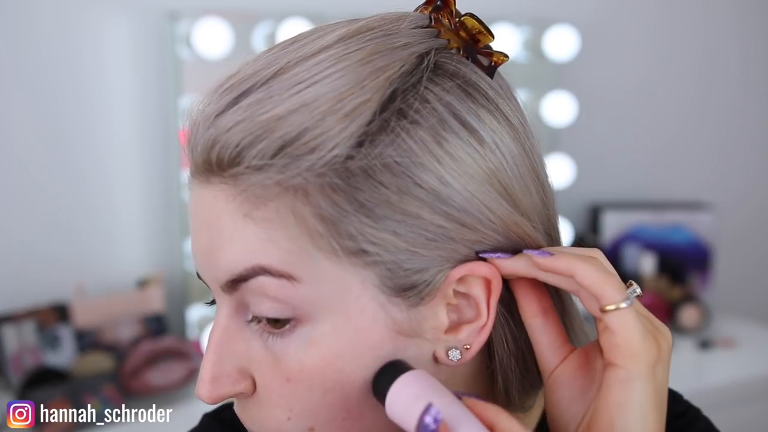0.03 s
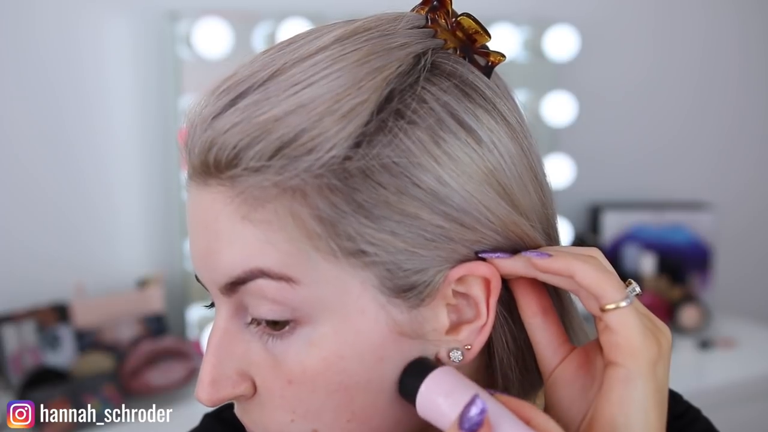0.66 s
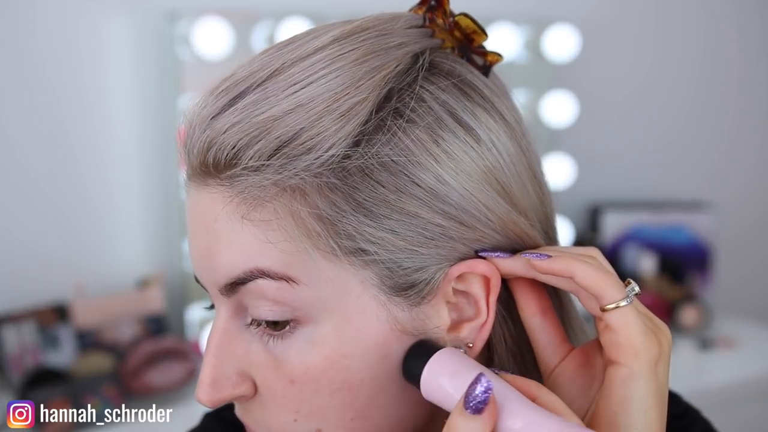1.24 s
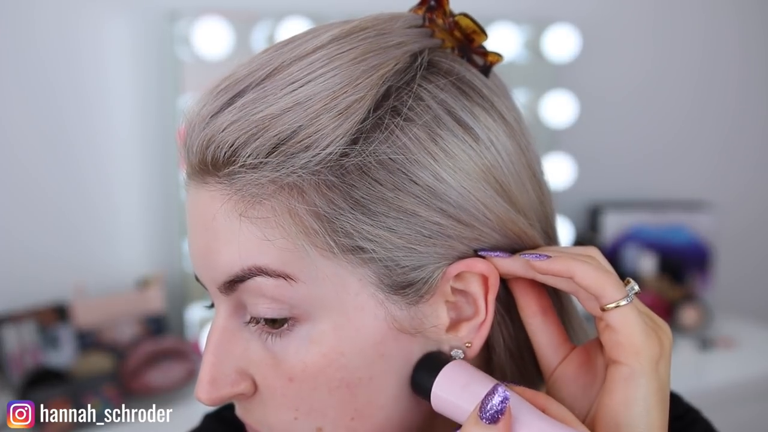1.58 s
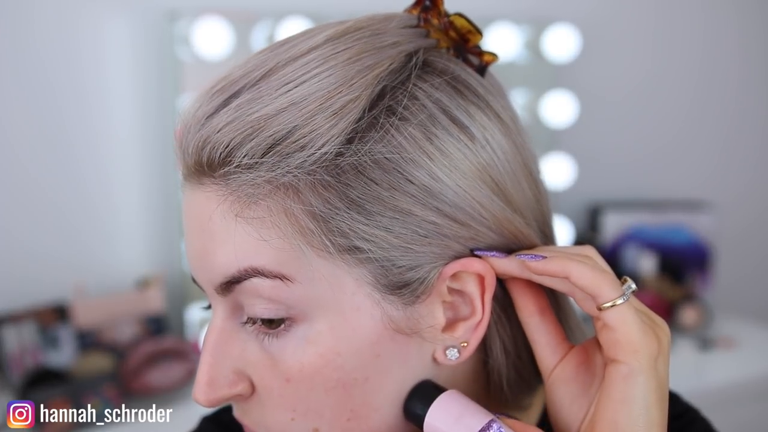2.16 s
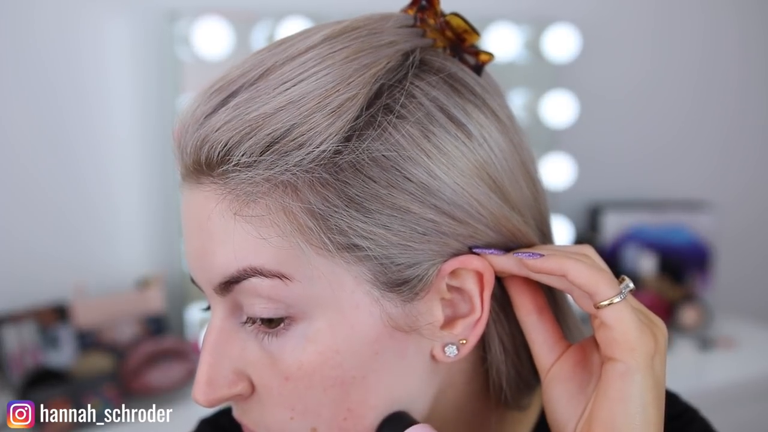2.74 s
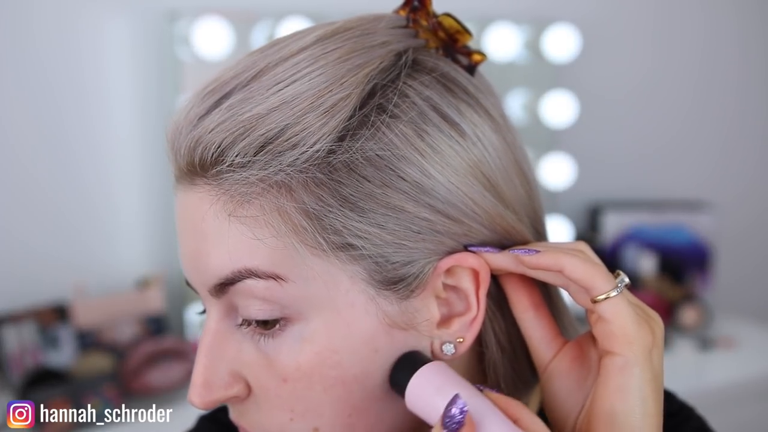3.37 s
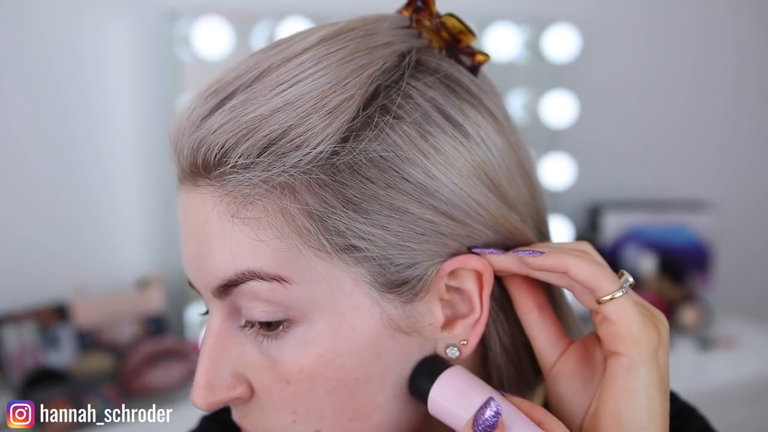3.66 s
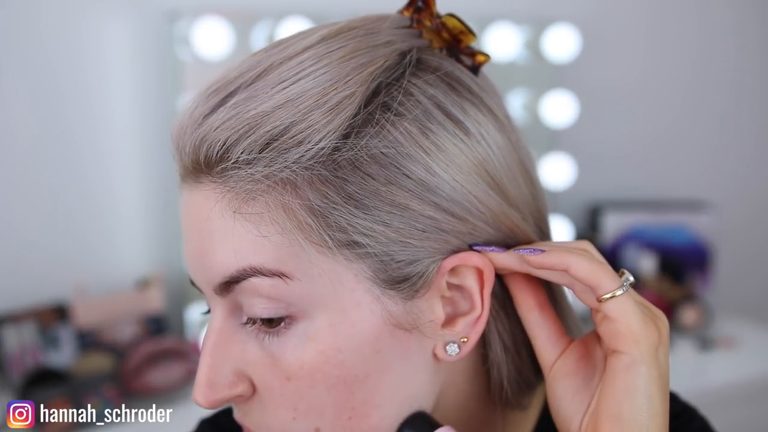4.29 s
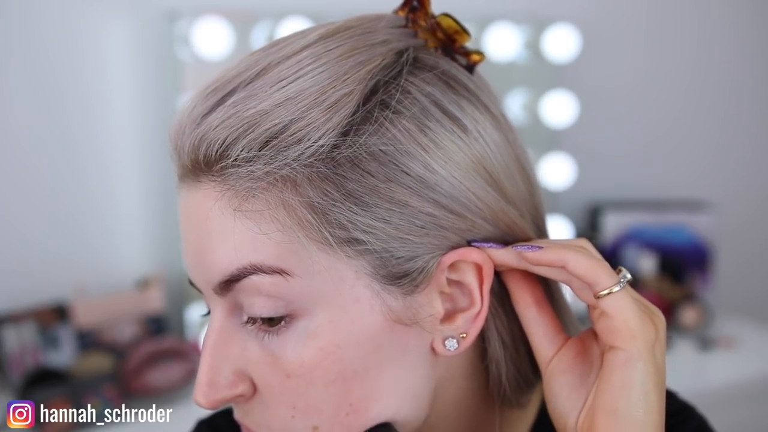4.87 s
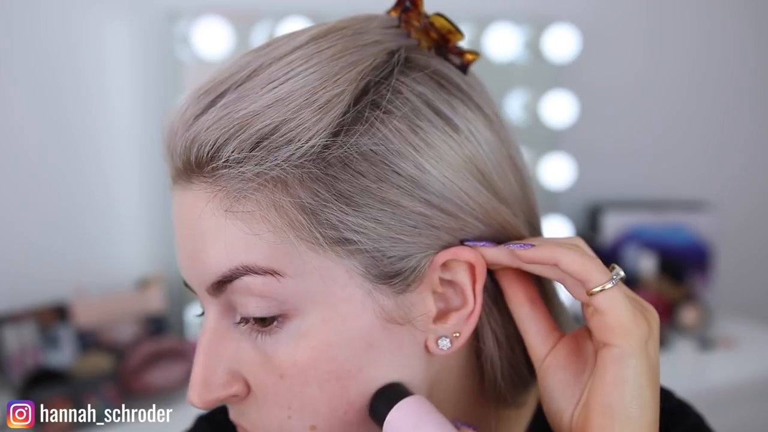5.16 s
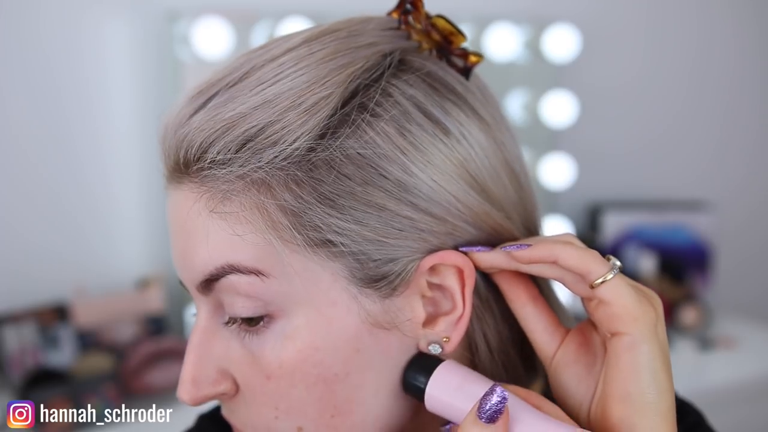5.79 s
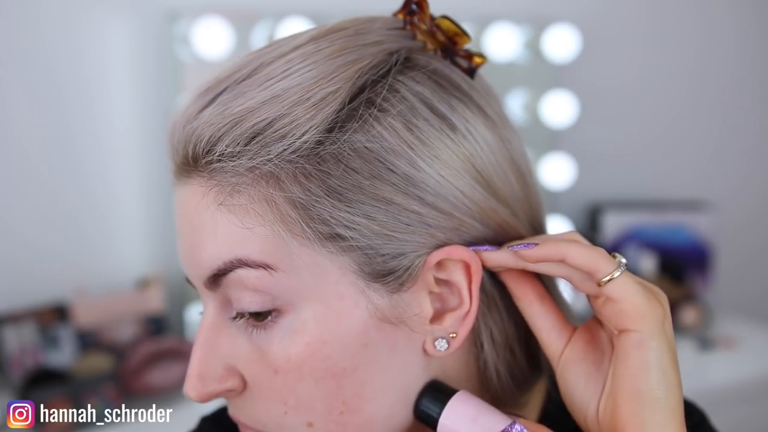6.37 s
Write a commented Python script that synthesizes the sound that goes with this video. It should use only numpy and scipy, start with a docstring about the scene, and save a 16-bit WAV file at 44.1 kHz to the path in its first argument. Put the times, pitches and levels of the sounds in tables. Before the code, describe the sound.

Close up in a quiet room, a little electric razor buzzes without a break as it moves over skin. Its spinning blade gives a high metallic whine and a fine scraping hiss, with a light plastic rattle underneath. The pitch dips and recovers several times as the motor is loaded, with occasional thin squeals and two small clusters of faint snips.

```python
'''A high, buzzing whine: a small battery razor circles over a cheek, close by in a quiet room.
On every turn its rotary blade knocks and scrapes inside the steel cap, driving the resonances of cap
and plastic handle; beneath them the motor hums, mostly on multiples of three times the turn rate.
Pressure on the skin slows the motor and turns the even buzz into a loose hiss.
Now and then the cap squeals or brushes the skin, and hairs are snipped.'''
import sys
import numpy as np
from scipy import signal
from scipy.fft import rfft, irfft, next_fast_len
from scipy.io import wavfile
from scipy.ndimage import uniform_filter1d, map_coordinates

SR = 44100
rng = np.random.default_rng(int(sys.argv[2]) if len(sys.argv) > 2 else 0)


def dump(signal):
    """Clip the signal to [-1, 1] and save it as 16-bit WAV at the path in sys.argv[1]."""
    limited = np.clip(np.atleast_2d(signal).T, -1, 1)
    pcm = np.round(limited * 32767).astype(np.int16)
    wavfile.write(sys.argv[1], SR, pcm)


N = 283563
TIME = np.arange(N) / SR
WHINE_HZ = 7107  # the cap's main resonance at the usual motor speed

# motor speed, sagging as the cap is pressed on the skin: (time [s], speed [turns/s])
MOTOR_SPEED = [(0.0, 82.6), (0.38, 79.6), (0.39, 79.6), (0.75, 83.7), (1.11, 82.1), (1.18, 80.5),
               (1.22, 80.2), (1.5, 83.3), (2.44, 85.2), (2.63, 85.9), (3.11, 83.6), (3.46, 79.7),
               (3.67, 80.1), (3.74, 79.7), (3.87, 79.9), (4.24, 86.3), (4.55, 87.3), (4.8, 86.5),
               (4.91, 85.6), (5.03, 85.7), (5.41, 82.3), (5.8, 83.7), (5.91, 83.4), (6.03, 84.8),
               (6.12, 85.2), (6.39, 83.0), (6.43, 83.1)]
# the blade's friction in the cap: (time [s], relative scrape level [dB], relative sizzle level [dB])
FRICTION_LEVELS = [(0.0, -27.5, -29), (0.03, -31.5, -44), (0.34, -30.5, -32.5), (0.91, -30, -39),
                   (1.11, -30, -32), (2.02, -33.5, -41), (2.22, -37.5, -36), (2.49, -34.5, -45),
                   (2.88, -34, -40), (2.97, -27.5, -32), (3.51, -28, -32), (3.8, -32, -47),
                   (3.94, -35, -39), (4.23, -32, -40), (4.62, -28.5, -32), (4.73, -29, -37),
                   (5.07, -29, -28), (5.57, -29, -32), (5.62, -28, -29), (6.11, -34.5, -32),
                   (6.25, -30.5, -37), (6.43, -31.5, -40)]
# the main resonance, swelling and dropping as the hand circles: (time [s], relative level [dB])
WHINE_LEVEL = [(0.0, -29), (0.2, -19), (0.43, -30.5), (0.53, -21), (0.72, -20), (0.82, -32.5), (0.97, -17),
               (1.13, -26), (1.2, -36), (1.23, -21.5), (1.29, -32), (1.45, -19.5), (2.69, -24), (2.83, -26),
               (3.06, -21), (3.63, -22), (3.71, -17), (3.9, -22), (4.05, -22.5), (4.14, -29), (4.57, -15.5),
               (4.76, -27.5), (4.78, -27), (5.37, -20), (5.39, -23.5), (5.71, -20), (6.05, -29.5),
               (6.43, -20.5)]
# response of the plastic handle: (frequency [Hz], gain [dB])
HANDLE_RESPONSE = [(900, -64), (1200, -16), (1450, -6), (1800, 0), (2050, 2), (2350, -5), (2600, -3.5),
                   (2950, -7.5), (3500, -2.5), (4300, 1.5), (5100, 2), (6000, -8), (8000, -45)]


def amp(db):
    """Decibels to amplitude ratio."""
    return 10 ** (np.asarray(db) / 20)


def curve(rows, column=1):
    """Linear interpolation of one table column at every sample."""
    rows = np.asarray(rows)
    return np.interp(TIME, rows[:, 0], rows[:, column])


def evened(x):
    """Normalisation to an overall rms of 1."""
    return x / np.sqrt(np.mean(x ** 2) + 1e-20)


def steadied(x, size=2100):
    """Normalisation to a running rms of 1 over a few turns."""
    return x / np.sqrt(uniform_filter1d(uniform_filter1d(x ** 2, size), size) + 1e-12)


def drift(rate_hz, count=8192):
    """Random modulation: noise of rms 1, low-passed at about rate_hz."""
    hz = np.fft.rfftfreq(count, TIME[-1] / count)
    slow = irfft(rfft(rng.standard_normal(count)) * np.exp(-(hz / rate_hz) ** 2))
    return np.interp(TIME, np.linspace(0, TIME[-1], count), evened(slow))


def coloured(x, response):
    """Spectral shaping by points of (frequency [Hz], gain [dB])."""
    size = next_fast_len(N)
    hz, db = np.transpose(response)
    gain = amp(np.interp(np.log(np.fft.rfftfreq(size, 1 / SR) + 1), np.log(hz), db))
    return irfft(rfft(x, size) * gain, size)[:N]


def resonate(x, hz, width_hz):
    """Resonance: a steep band-pass whose centre follows hz."""
    carrier = np.exp(2j * np.pi * np.cumsum(hz * np.ones(N)) / SR)
    r = np.exp(-np.pi * width_hz / SR)
    return (carrier * signal.lfilter([(1 - r) ** 2], [1, -2 * r, r * r], x / carrier)).real


def blend(regular, irregular, share):
    """Incoherent sounds add in power; share is the irregular fraction."""
    share = np.clip(share, 0, 1)
    return np.sqrt(1 - share) * steadied(regular) + np.sqrt(share) * steadied(irregular)


def sag(usual_speed=83.5):
    """Loading slows the motor: the turns per second lost from its usual speed."""
    return usual_speed - curve(MOTOR_SPEED)


def looseness():
    """Aperiodicity of the blade, 0-1: it grows with load and as the scrape takes over from the whine."""
    excess_db = curve(FRICTION_LEVELS) - curve(WHINE_LEVEL)
    return np.clip(0.44 + 0.027 * sag() + 0.01 * (excess_db - excess_db.mean()), .05, .95)


def room(level_db):
    """Ambient noise: faint, steady and densest at low frequencies."""
    # background spectrum: (frequency [Hz], gain [dB])
    spectrum = [(10, 8), (30, 4.5), (45, 4.5), (100, 1), (200, -1), (350, -2), (700, -7), (1200, -10),
                (16000, -13.5)]
    return amp(level_db) * evened(coloured(rng.standard_normal(N), spectrum))


def skin(uneven_db, fade_s=0.057):
    """Sliding friction: each stroke of the cap on the cheek makes a soft, lumpy noise."""
    # strokes over the skin: (start [s], end [s], level [dB])
    strokes = [(0.708, 1.122, -60), (1.148, 1.29, -59), (1.45, 2.17, -61.5), (4.3, 5.15, -60.5)]
    # rubbing spectrum: (frequency [Hz], gain [dB])
    spectrum = [(100, -22), (290, -1.5), (370, -12), (470, 4.5), (580, -4.5), (800, -4.5), (1500, -22)]
    lumps = amp(uneven_db * drift(31))
    envelope = sum(amp(db) * np.clip(np.minimum(TIME - start, end - TIME) / fade_s, 0, 1)
                   for start, end, db in strokes)
    return envelope * evened(coloured(rng.standard_normal(N), spectrum) * lumps)


def motor(turns, waver_db, jitter_turns, dip_speed=85.8, dip_width=0.36):
    """Rotational harmonics of a three-pole motor; the weaker fade under load and waver with the grip."""
    # motor tones: (order [multiple of the turn rate], relative level [dB])
    harmonics = [(15, -18), (18, -14.5), (21, -2), (24, -14.5), (27, -9.5), (30, -17), (42, -11.5),
                 (43, -12), (45, -13.5), (54, -5.5), (60, -8.5)]
    loose, tones = looseness(), 0
    # the strongest tone, order 21, dips as the motor passes dip_speed
    dip = np.exp(-((curve(MOTOR_SPEED) - dip_speed) / dip_width) ** 2)
    hum_db = -43.5 - 5 * dip + drift(13)
    shaken = turns + jitter_turns * loose * drift(370)  # a loose blade shakes the shaft
    for order, db in harmonics:
        level_db = hum_db if order == 21 else -43 - 8 * loose + waver_db * drift(2.44)
        tones += amp(db + level_db) * np.sqrt(2) * np.cos(2 * np.pi * (order * shaken + rng.random()))
    return tones


def roughness(turns, change_per_s, size=2048, harmonics=190):
    """Quasi-periodic excitation: each turn meets the same roughness, which changes as the cap shifts."""
    spectra = rng.standard_normal((100, harmonics, 2)) @ [1, 1j]
    spectra[:, 0] = 0
    profiles = irfft(spectra, size)
    position = [TIME * change_per_s, turns % 1 * size]
    return steadied(map_coordinates(profiles, position, order=1, mode="grid-wrap"))


def knocks(turns, decay_turns, rub, uneven_db):
    """Contact force: the blade strikes the cap at three places a turn and rubs in between."""
    force = rub
    for place, db in [(.06, -12.5), (.26, -13), (.5, -9.5)]:
        since = (turns - place - 0.016 * drift(1.2)) % 1
        force += amp(db + uneven_db * drift(0.87)) * np.exp(-since / decay_turns)
    return force


def cheek_reflection(x, delay_s, sway, strength):
    """Comb filtering: the sound interferes with its reflection, whose delay shifts as the hand circles."""
    delay = delay_s * np.exp(sway * drift(1.49))
    return x + strength * map_coordinates(x, [(TIME - delay) * SR], order=3)


def friction(turns, periodic, slips, response, share, bite, flicker_db):
    """Source and filter: friction, pulsed by the knocks (more deeply with bite), excites one part."""
    force = knocks(turns, decay_turns=0.1, rub=0.48, uneven_db=6.5)
    drive = blend(periodic, slips, share) * force ** bite
    drive = cheek_reflection(drive, delay_s=.0011, sway=0.1163, strength=0.37)
    return steadied(coloured(drive, response)) * amp(flicker_db * drift(12.7))


def singing(turns, partials, waver_db, jitter_turns):
    """Forced vibration: the cap sings at harmonics of the turn rate, each wavering by waver_db."""
    shaken = turns + jitter_turns * drift(140)
    return sum(height * amp(waver_db * drift(9)) * np.cos(2 * np.pi * (order * shaken + rng.random()))
               for order, height in partials)


def snips(slips, cut_s, drag_s, ring_hz, width_hz):
    """Transient excitation: each hair drags in the slots and is cut with a crunch in the handle."""
    # hairs being cut: (time [s], relative level [dB])
    hairs = [(2.915, -57), (3.06, -62), (3.1, -42), (3.165, -50), (4.93, -52), (5.028, -47), (5.083, -42),
             (5.19, -56)]
    bursts = 0
    for at, db in hairs:
        cut = np.exp(-((TIME - at) / cut_s) ** 2)
        drag = np.exp(-((TIME - at) / drag_s) ** 2)
        bursts += amp(db) * (.75 * cut + .36 * drag)
    return bursts * evened(coloured(resonate(slips, ring_hz, width_hz), HANDLE_RESPONSE))


def handle(turns, periodic, slips, loose):
    """Structure-borne sound: the blade's knocks rattle the plastic handle."""
    # the rattle: (time [s], relative level [dB])
    level = [(0.0, -44.5), (0.03, -51), (2.36, -52.5), (3.13, -49), (3.9, -54), (4.05, -49), (6.43, -48)]
    rattle = friction(turns, periodic, slips, HANDLE_RESPONSE, 0.091 + loose, bite=1.3, flicker_db=1.84)
    return rattle * amp(curve(level) + 6)


def scrape(turns, periodic, slips, loose):
    """Broadband friction noise in the cap: a buzz when periodic, a hiss when the blade slips."""
    # the cap's broad response: (frequency [Hz], gain [dB])
    response = [(1200, -35), (2900, -21), (3500, -15.5), (4500, -18), (5100, -2.5), (5900, 5.5), (6600, 7),
                (7700, 4.5), (8500, 0), (9500, -12), (12000, -11.5), (13300, -2), (16000, -22)]
    rasp = friction(turns, periodic, slips, response, 1.12 * loose ** 0.81, bite=1, flicker_db=1.46)
    return rasp * amp(curve(FRICTION_LEVELS) + 3.63)


def ring(turns, periodic, slips, loose):
    """The cap's upper resonance, near 11 kHz: friction noise, with faint partials when the blade runs evenly."""
    # its response: (frequency [Hz], gain [dB])
    response = [(7500, -33), (8700, -12.5), (9700, -1), (10500, -1), (11100, 4), (11700, 0.5), (12400, -6),
                (13400, -18), (16000, -36)]
    # its clear tones: (order [multiple of the turn rate], amplitude [relative])
    partials = [(128, .9), (132, 1), (133, .6)]
    # its strength: (time [s], relative level [dB])
    level = [(0.0, -28), (0.07, -25.5), (0.45, -30), (0.75, -26.5), (0.81, -30.5), (0.95, -26), (1.16, -31),
             (2.47, -27.5), (2.63, -28), (2.79, -31), (3.15, -28.5), (4.01, -33.5), (4.64, -28.5),
             (4.84, -30), (4.99, -27), (5.73, -34), (6.43, -26.5)]
    rasp = friction(turns, periodic, slips, response, 0.85 * loose ** 0.81, bite=0.99, flicker_db=1.95)
    tones = singing(turns, partials, waver_db=-3, jitter_turns=0.00027)
    return blend(tones, rasp, 0.44 + 1.22 * loose) * amp(curve(level) + 2)


def sizzle(turns, periodic, slips, loose):
    """Loss of coherence: small slips spoil the highest partials first, leaving a hiss near 15 kHz."""
    # the cap's highest band: (frequency [Hz], gain [dB])
    response = [(7500, -28), (9000, 2), (11500, -16), (13300, -2), (14200, 16), (15000, 25), (15800, 3.5)]
    # its clear tones: (order [multiple of the turn rate], amplitude [relative])
    partials = [(168, 1), (172, .8), (175, .7), (176, .7)]
    hiss = friction(turns, periodic, slips, response, 1.6 * loose ** 0.39, bite=0.48, flicker_db=0)
    tones = singing(turns, partials, waver_db=0, jitter_turns=.0004)
    return blend(tones, hiss, 0.69 + 0.61 * loose) * amp(curve(FRICTION_LEVELS, column=2) + 0.5)


def squeals(turns, loose, width_hz):
    """Friction-driven resonance: the blade catches one narrow mode of the cap, which swells and fades."""
    # caught modes: (start [s], end [s], frequency [Hz], peak level [dB])
    modes = [(0, .28, 13850, -32), (0.455, 0.917, 10780, -23.5), (0.815, 1.138, 10960, -26),
             (1.367, 1.953, 10300, -25.5), (2.2, 2.802, 4910, -42.5), (1.7, 2.65, 6450, -32),
             (2.457, 2.804, 11640, -31), (2.88, 3.15, 13900, -30), (2.8, 3.75, 13000, -34),
             (3.616, 3.88, 7330, -21), (3.83, 4.253, 3440, -42.5), (4.204, 4.765, 5210, -32.5),
             (4.28, 4.794, 3900, -42.5), (4.52, 4.75, 12800, -30), (6.07, 6.524, 10700, -26.5),
             (6.14, 6.55, 3570, -40)]
    force = knocks(turns, decay_turns=.15, rub=.2, uneven_db=4)
    drive = blend(roughness(turns, change_per_s=1.485), rng.standard_normal(N), 0.21 * loose) * force
    out = np.zeros(N)
    for start, end, hz, db in modes:
        swell = np.sin(np.pi * np.clip((TIME - start) / (end - start), 0, 1))
        out += amp(db) * swell * steadied(resonate(drive, hz, width_hz * np.sqrt(hz / WHINE_HZ)))
    return out


def whine(turns, periodic, slips, loose, hz_per_speed=71):
    """Line broadening: the cap's main resonance whistles under an even blade; a loose one smears it."""
    # the whistle's tones: (order [multiple of the turn rate], amplitude [relative])
    partials = [(81, .33), (84, .5), (85, 1), (86, .8)]
    force = knocks(turns, decay_turns=0.56, rub=0.87, uneven_db=5.5)
    drive = blend(periodic, slips, 0.49 * loose ** 2) * force
    pitch = WHINE_HZ - hz_per_speed * sag()
    narrow = resonate(drive, pitch, width_hz=300)
    smeared = resonate(drive, pitch, width_hz=800)
    rasp = blend(narrow, smeared, 4.48 * loose - .75)
    whistle = singing(turns, partials, waver_db=6, jitter_turns=.0004)
    tone = steadied(blend(whistle, rasp, 2.2 * loose - .05), size=1200)
    return tone * amp(curve(WHINE_LEVEL) - 0.54 + 0.72 * drift(20))


def blade(turns):
    """Superposition: periodic friction and random slips excite the cap and handle, whose sounds add."""
    loose = looseness()
    periodic, slips = roughness(turns, change_per_s=3.5), rng.standard_normal(N)
    buzz = sum(part(turns, periodic, slips, loose) for part in (handle, scrape, ring, sizzle))
    squealing = squeals(turns, loose, width_hz=460)
    crunch = snips(slips, cut_s=0.012, drag_s=0.09, ring_hz=1760, width_hz=3000)
    return buzz + squealing + crunch + whine(turns, periodic, slips, loose)


def scene():
    """One shaft sets the phase of blade and motor; a single close microphone feeds both channels."""
    turns = np.cumsum(curve(MOTOR_SPEED)) / SR + 0.00057 * drift(28)  # the shaft flutters slightly
    razor = blade(turns) + motor(turns, waver_db=4, jitter_turns=0.0011)
    mono = razor + skin(uneven_db=3) + room(level_db=-56)
    return np.array([mono, mono])


def record(dry):
    """Band limiting: a steep low-pass at 15.78 kHz."""
    low_pass = signal.firwin(511, 15780, window=("kaiser", 9), fs=SR)
    return signal.oaconvolve(dry, low_pass[None], "same")


dry = scene()
out = record(dry)
dump(out)
```